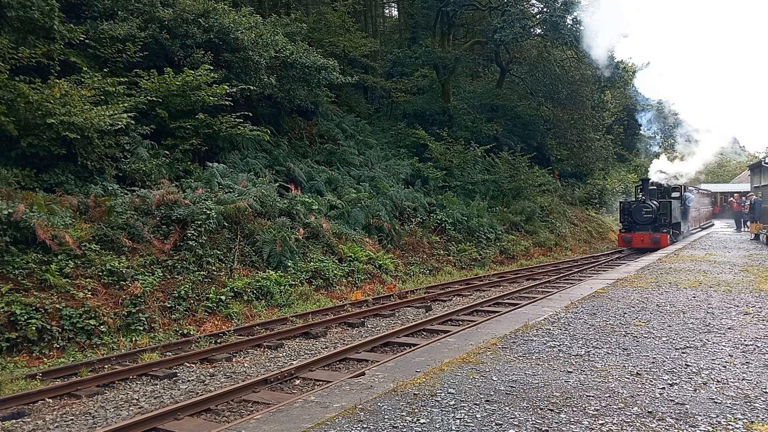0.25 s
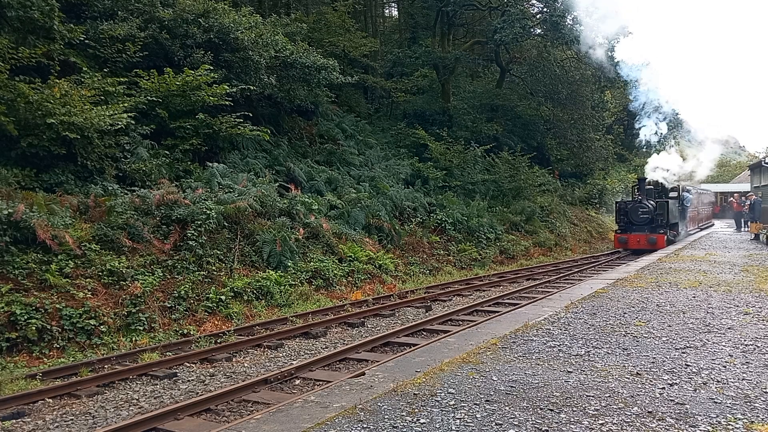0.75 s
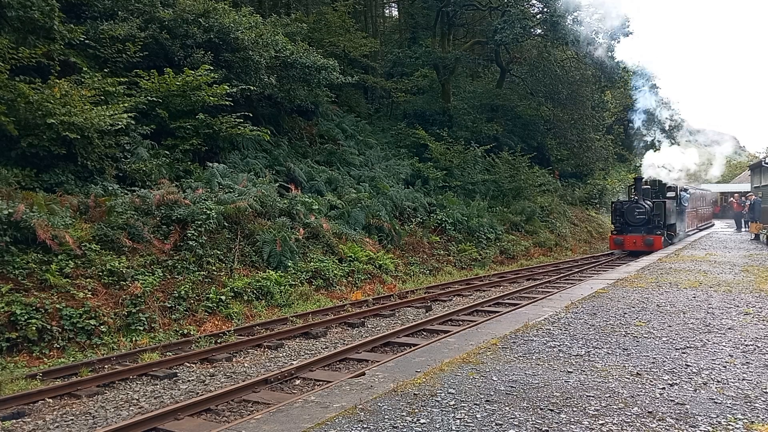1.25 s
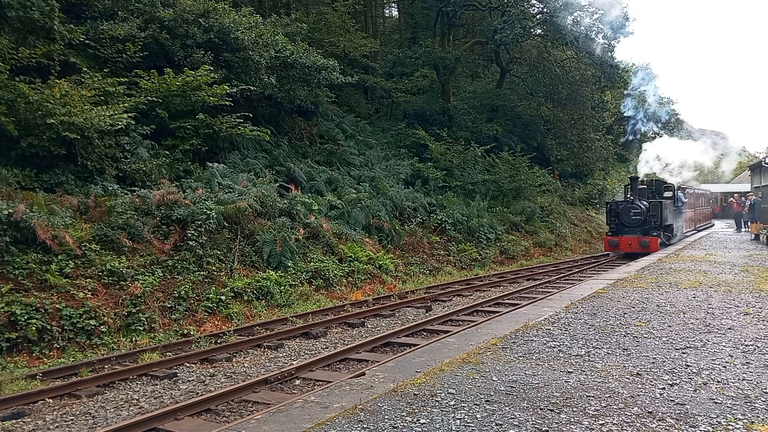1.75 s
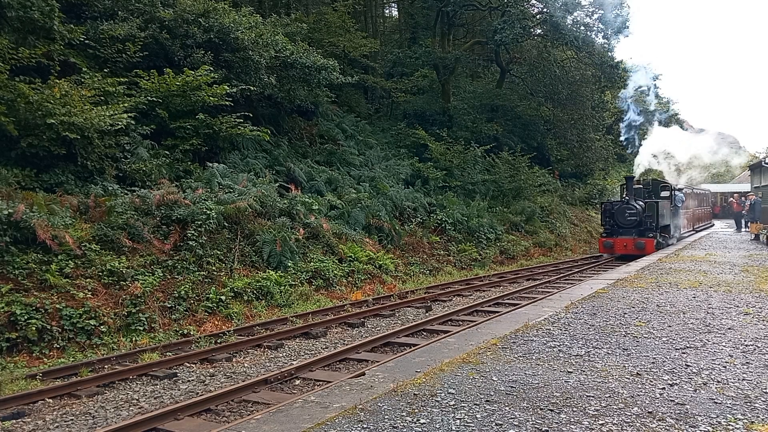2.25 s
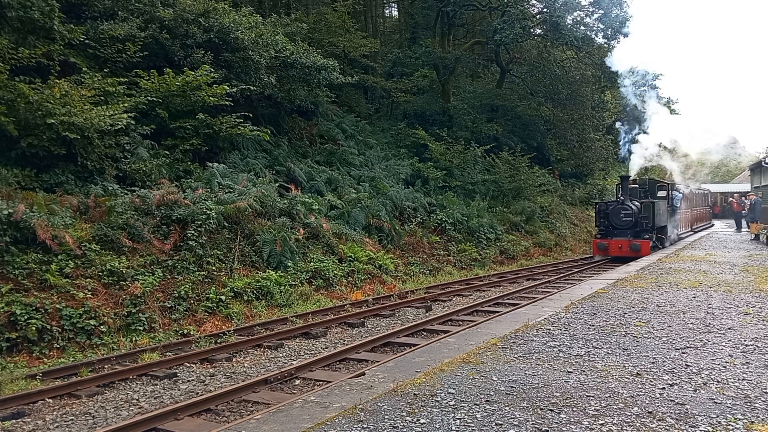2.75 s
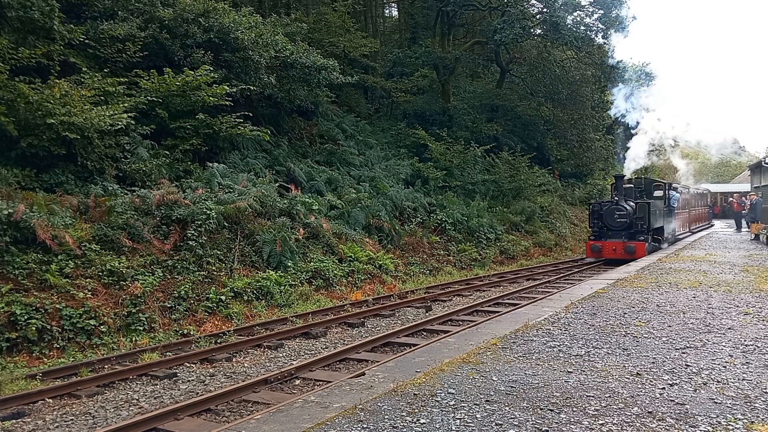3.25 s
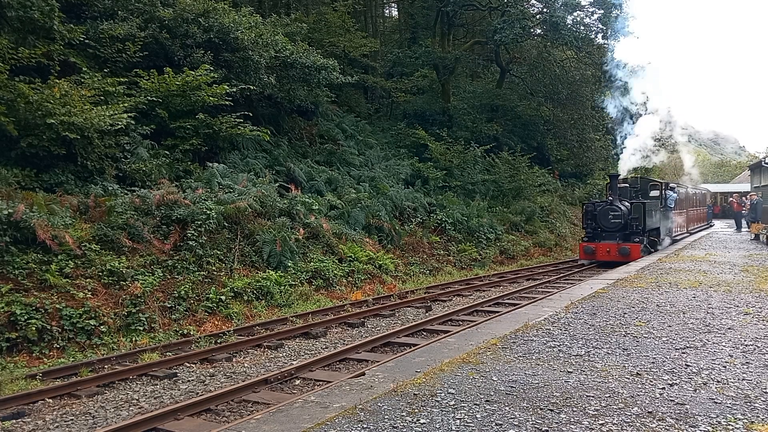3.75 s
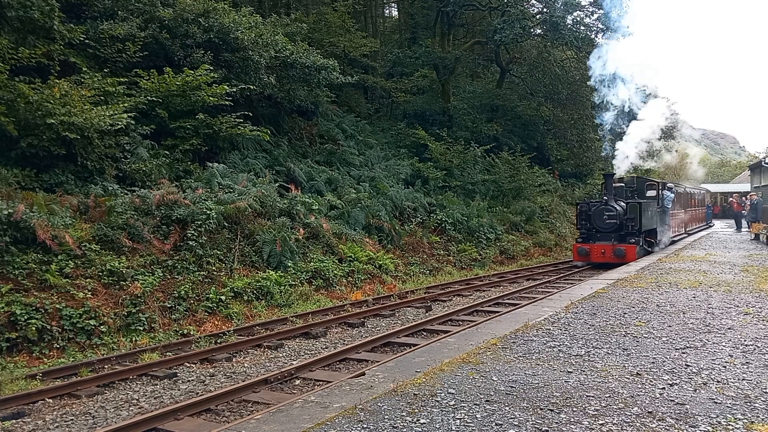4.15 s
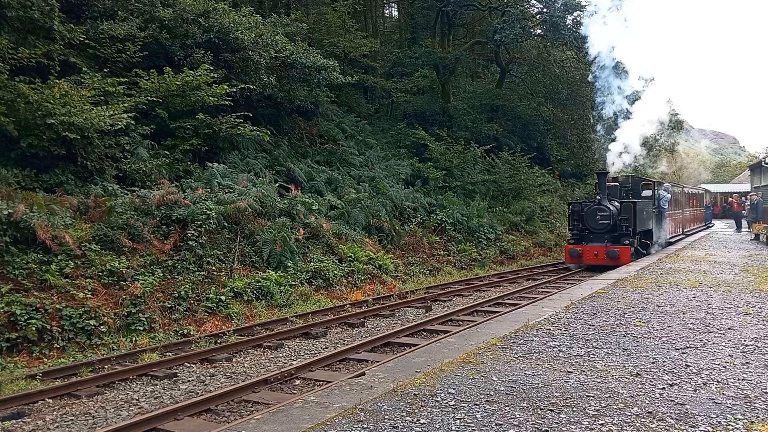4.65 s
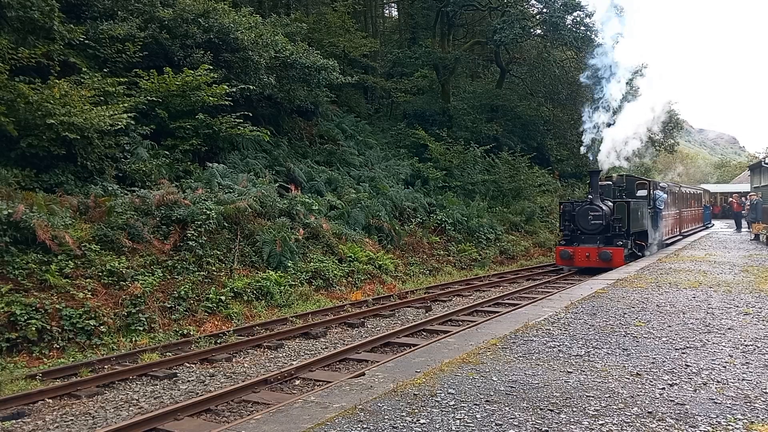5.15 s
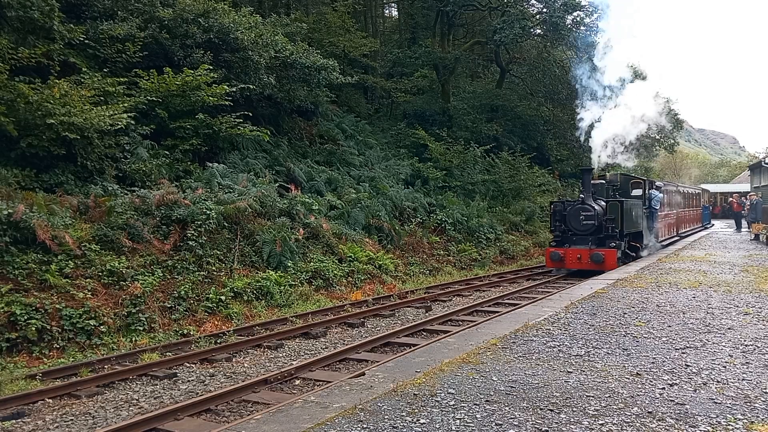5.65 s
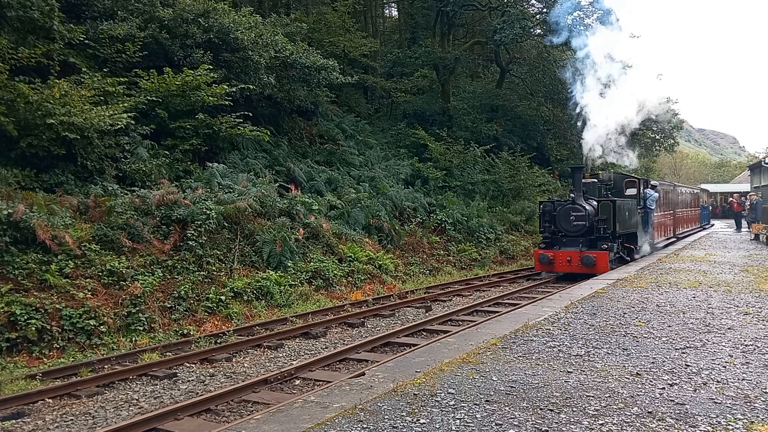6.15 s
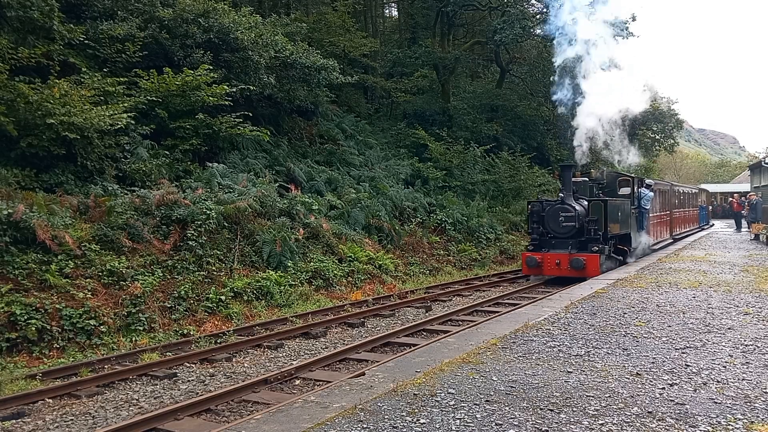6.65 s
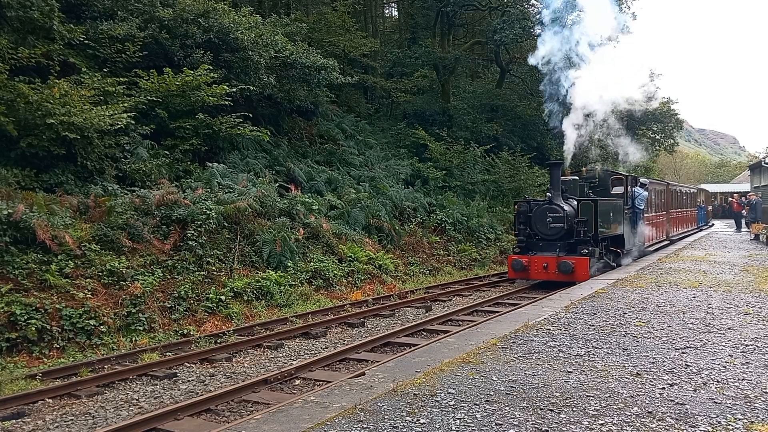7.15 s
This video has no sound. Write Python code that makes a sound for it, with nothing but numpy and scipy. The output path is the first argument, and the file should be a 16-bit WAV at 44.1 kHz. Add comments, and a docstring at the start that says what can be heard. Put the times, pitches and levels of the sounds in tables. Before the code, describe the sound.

A small steam locomotive pulls away from a station, its chuffs quickening and growing louder as it nears, with steam hiss and wheel rumble.

```python
"""At a small railway station a steam locomotive pulls away towards two microphones, keeping to their right.
Exhaust beats, four a wheel turn, bark up the chimney, faster and louder: bursts of noise and ringing tones.
Hissing steam leaks, fire draught and wheel rumble are shaped noise; rail joints thud as sagging, dying sines.
A wooded bank answers the beats with noisy echo tails, and a faint horn-like tone of sines sounds far off."""
import sys
import numpy as np
from scipy import signal
from scipy.fft import rfft, irfft, next_fast_len
from scipy.io import wavfile
from scipy.ndimage import uniform_filter1d, map_coordinates

SR = 44100
rng = np.random.default_rng(int(sys.argv[2]) if len(sys.argv) > 2 else 0)


def store_wav(level_fs):
    """Save 16-bit WAV to argv[1]."""
    pcm = np.round(np.clip(np.atleast_2d(level_fs), -1, 1) * 32767)
    wavfile.write(sys.argv[1], SR, pcm.T.astype(np.int16))


N = 325899


def amp(db):
    """Turn decibels into a plain gain."""
    return 10 ** (np.asarray(db) / 20)


def unit(x):
    """Scale to an rms of 1."""
    return x / np.sqrt(np.mean(x ** 2) + 1e-20)


def along(points, hz):
    """Read (Hz, value) points by straight lines on a log frequency axis."""
    f, v = np.transpose(points)
    return np.interp(np.log(hz + 1), np.log(f + 1), v)


def curve(points):
    """Join (s, value) points by straight lines, one value per sample."""
    return np.interp(np.arange(N) / SR, *np.transpose(points))


def wobble(rate):
    """A smooth random curve with this many random knots a second."""
    knots = rng.standard_normal(int(N * rate / SR) + 4)
    return map_coordinates(knots, [np.arange(N) * rate / SR])


def filtered(x, response):
    """Filter x by a complex response of frequency."""
    m = next_fast_len(N + SR // 2)
    return irfft(rfft(x, m) * response(np.fft.rfftfreq(m, 1 / SR)), m)[..., :N]


def mode(hz, centre_hz, width_hz):
    """A resonance with a gain of 1 at its centre."""
    return 1j * hz * width_hz / (centre_hz ** 2 - hz ** 2 + 1j * hz * width_hz)


def rush(spectrum, patchy_db):
    """Two unrelated noises of one colour and joint rms 1, sharing patches of random gain."""
    z = signal.stft(rng.standard_normal((2, N)), nperseg=512)[2]
    patches = uniform_filter1d(rng.standard_normal(z.shape[1:]), size=5, axis=0)  # smooth over frequency
    patches = uniform_filter1d(patches, size=8, axis=1)  # and over time
    pair = signal.istft(z * amp(patchy_db * unit(patches)), nperseg=512)[1][:, :N]

    def colour(hz):
        inside = (hz > spectrum[0][0]) * (hz < spectrum[-1][0])
        return amp(along(spectrum, hz)) * inside
    return unit(filtered(pair, colour))


def steady(hz, width, evenness):
    """Two narrow noises whose swells are partly evened out, as in a pipe that holds its tone."""
    shape = lambda f: mode(f, hz, width) * mode(f, hz, 11.0 * width)
    noise = filtered(rng.standard_normal((2, N)), shape)
    narrow = signal.hilbert(noise, next_fast_len(N))[:, :N]
    return unit(narrow.real / np.abs(narrow) ** np.clip(evenness, 0, 1))


def approach_db():
    """Gain of the inverse-distance law as the engine gathers speed towards the microphones."""
    start_m, speed_m_s, pull_m_s2 = 40, 1.98, 0.081
    t = np.arange(N) / SR
    distance_m = start_m - speed_m_s * t - pull_m_s2 * t ** 2 / 2
    return 20 * np.log10(start_m / distance_m)


def exhaust():
    """The turbulent jet barks, blows the chimney like an organ pipe and fizzes on top."""
    # jet heard at a distance: f/Hz, level per Hz/dB
    jet_far = [(320, -12.5), (540, -5), (650, -18), (860, 3), (940, 4.5), (1200, -3.5), (1420, -5),
               (1620, -37), (2000, -19), (2400, -18), (3200, -85)]
    # jet heard close by: f/Hz, level per Hz/dB
    jet_near = [(320, -8), (540, -16), (657, -5.5), (728, 1), (964, -1.5), (1020, 3.5), (1170, -18),
                (1470, -21), (1590, -20), (1650, -45), (2140, -57), (3630, -120)]
    # bass shoulder of the jet: f/Hz, level per Hz/dB
    jet_low = [(40, -36), (70, -6.5), (110, -5.5), (170, -5), (300, -1.5), (390, -14), (560, -13.5),
               (700, -36)]
    # fizz on top of the jet: f/Hz, level per Hz/dB
    fizz_colour = [(1900, 2), (2300, 0.5), (3000, 1), (4200, -1.5), (6000, -5.5), (7800, -7), (8700, -17),
                   (11500, -17), (15500, -28)]
    # resonances of chimney and smokebox: f/Hz, basic width/Hz (scaled below)
    chimney = [(244, 21.3), (482, 45.4), (1790, 250)]
    jet, low, octave, bass, upper, fizz = blast()
    # the ground echo recolours the jet as the engine nears
    near = np.clip(np.arange(N) / SR / 5.55, 0, 1) ** 2.7
    eddies = amp(0.94 * wobble(90))
    bark = np.sqrt(1 - near) * rush(jet_far, patchy_db=1.0)
    bark += np.sqrt(near) * rush(jet_near, patchy_db=2.0)
    shoulder = rush(jet_low, patchy_db=-1.0)
    sound = eddies * (amp(0.5) * jet * bark + amp(5.0) * bass * shoulder)
    for flow, (hz, width) in zip((low, octave, upper), chimney):
        drive = flow * steady(hz, 1.13 * width, evenness=0.37)
        ringing = filtered(drive, lambda f: mode(f, hz, 1.91 * width))
        sound += amp(3.5) * ringing
    return sound + amp(-3.5) * fizz * eddies * rush(fizz_colour, patchy_db=3.0)


def blast():
    """Strength of six sounds in every beat: a quick swell as the valve opens, then the cylinder empties."""
    # exhaust beats, levels before the mix gains: peak t/s, jet level/dB,
    # then level over the jet/dB of the chimney fundamental and of the fizz
    beats = [(-.04, -20, 1.5, -17.5), (0.263, -26.5, -.5, -11), (0.551, -28.5, -6.5, -11.5),
             (0.884, -25.5, 1, -12.5), (1.204, -26.5, 2, -14), (1.513, -24.5, 0, -16.5),
             (1.796, -25.5, -6.5, -11), (2.110, -24.5, -4, -10.5), (2.412, -26.5, 1, -12.5),
             (2.71, -21, -7, -15), (2.978, -23, -5, -13.5), (3.28, -22, -0.5, -16), (3.562, -24, -8, -12.5),
             (3.839, -21, -8.5, -14), (4.094, -22.5, -9, -13), (4.394, -20.5, -6, -13.5),
             (4.657, -21.5, -6.5, -16), (4.909, -22, -9.5, -7.5), (5.161, -24.5, -9.5, -13.5),
             (5.45, -20, -1.5, -14), (5.715, -19, -3, -24), (5.976, -21, -8.5, -16.5),
             (6.221, -19, -9, -18.5), (6.502, -17, -13, -16.5), (6.761, -19.5, -3, -16.5),
             (7.014, -16, -8, -17), (7.254, -18.5, -9, -16.5)]
    # octave, bass, upper resonance: basic level at the start/dB, gain per dB of approach/dB
    companions = [(-26.5, -1.77), (-37, -0.06), (-43.5, 2)]
    # fall time of jet, fundamental, octave, bass, upper resonance, fizz: multiple of fall_ms
    linger = [0.88, 1.31, 1.26, 1.72, 1.22, 1.74]
    rise_ms, fall_ms = 15.65, 36.1
    scatter_db = 1.5  # random spread of the companions from beat to beat
    lead = SR // 10  # samples kept ahead of each peak
    flow = np.zeros((6, N + 2 * SR))  # with a spare second at each end
    t = np.arange(-lead, SR // 4) / SR
    span = np.where(t < 0, rise_ms, np.array(linger)[:, None] * fall_ms) / 1000
    puff = np.exp(-np.abs(t / span) ** 2.07)
    start_db, grows = np.transpose(companions)
    chances_db = scatter_db * rng.standard_normal((len(beats), len(companions)))
    near_db = approach_db()
    for (s, db, ring_db, fizz_db), chance_db in zip(beats, chances_db):
        others_db = start_db + grows * near_db[max(round(s * SR), 0)] + chance_db
        levels_db = np.r_[db, db + ring_db, others_db, db + fizz_db]
        start = SR + round(s * SR) - lead
        flow[:, start:start + len(t)] += amp(levels_db)[:, None] * puff
    return flow[:, SR:SR + N]


def steam_leaks():
    """Steam escaping from glands and cocks: a broad hiss with whistling tones, a thin whistle and a top hiss."""
    # hiss of the leaks: f/Hz, level per Hz/dB
    leak_colour = [(1290, -26), (2200, -6.5), (2700, -14), (3010, -3), (3580, -7), (4000, -3.5),
                   (4720, -7.5), (5170, -7.5), (6100, -4.5), (7540, -4), (8310, -6), (8860, -56),
                   (10200, -13), (13300, -53), (22000, -120)]
    # broad tones of the leaks: f/Hz, width of the narrower filter/Hz, basic level/dB
    nozzle = [(5400, 700, -6), (6520, 200, -11), (7460, 320, -4)]
    # highest hiss: f/Hz, level per Hz/dB
    top_colour = [(9000, -57), (10100, -28), (10700, 1), (12100, -0.5), (13700, -1.5), (14800, -7),
                  (15700, -12)]
    # flare-ups of the top hiss: t/s, rise/dB, dying time/s
    surges = [(4.6, 1, .2), (5.1, 4.5, 0.11)]
    # thin whistle of one leak: f/Hz, width of the narrower filter/Hz
    thin_tone = (5650, 36)
    # its strength: t/s, level/dB
    thin_level = [(0, -58), (.5, -63), (.9, -57), (2.1, -50.5), (4, -53), (4.7, -66), (5.1, -51),
                  (7.39, -56)]
    t, near_db = np.arange(N) / SR, approach_db()
    # start level in dB before the sputter, and growth as a multiple of the inverse-distance law
    leak_db = -46 + 1.11 * near_db
    top_db = -54.5 + 1.93 * near_db
    for s, db, dying in surges:
        top_db += db * (t > s) * np.exp(-np.abs(t - s) / dying)
    white = rng.standard_normal((2, N))
    whistle = np.zeros((2, N))
    for hz, width, db in nozzle:
        tone = unit(filtered(white, lambda f: mode(f, hz, width) * mode(f, hz, 6.8 * width)))
        whistle += amp(db + 0.77 * wobble(2.94)) * tone
    sputter_db = 0.42 * wobble(9.9)
    hiss = rush(leak_colour, patchy_db=1.96) + amp(0.5) * whistle
    leak = amp(leak_db + sputter_db) * hiss
    thin = amp(curve(thin_level)) * steady(*thin_tone, evenness=0.33)
    top = amp(top_db + sputter_db) * rush(top_colour, patchy_db=2.0)
    return leak + thin + top


def fire_draught():
    """The draught of the fire in the chimney: a wavering low roar that grows as the engine nears."""
    # roar of the draught: f/Hz, level per Hz/dB
    draught_colour = [(120, -29), (200, -3), (245, 6.5), (280, -5.5), (320, -6), (390, -7), (470, -6),
                      (600, -8.5), (1000, -11.5), (1600, -17.5), (2700, -21), (4000, -41)]
    # start level in dB before the wavering, and growth as a multiple of the inverse-distance law
    level_db = -39.5 + 0.99 * approach_db()
    return amp(level_db + 0.64 * wobble(19)) * rush(draught_colour, patchy_db=2.0)


def wheel_rumble():
    """Rolling wheels: deep noise with an unsteady level."""
    # colour of the rumble: f/Hz, level per Hz/dB
    rumble_colour = [(22, -36), (42, -33), (65, -5.5), (110, -4), (170, -6.5), (260, -31), (400, -43)]
    # rumble before the random unsteadiness: t/s, level/dB
    wheels = [(0, -46), (.8, -44.5), (1.2, -41.5), (2.8, -43), (3.2, -39), (4.8, -39), (5.14, -34),
              (5.6, -40.5), (6.2, -39), (6.6, -37.5), (7.39, -40.5)]
    return amp(curve(wheels) + 1.5 * wobble(16)) * rush(rumble_colour, patchy_db=0.5)


def joints():
    """Each wheel drop on a rail joint is a dull, quickly damped thud that sags in pitch."""
    # wheels on rail joints: start t/s, level before rise and decay/dB, pitch it sags to f/Hz
    drops = [(2.933, -27, 85), (3.218, -13, 92.4), (7.118, -21, 100), (7.132, -18, 79)]
    out, t = np.zeros(N + SR), np.arange(SR // 4) / SR
    for s, db, hz in drops:
        turns = hz * (t + 0.0081 * (1 - np.exp(-t / 0.0039)))
        rise = 1 - np.exp(-t / 0.0033)
        decay = amp(db - 60 * t / 0.1)  # 60 dB down in 0.1 s
        out[round(s * SR):][:len(t)] += decay * rise * np.sin(2 * np.pi * turns)
    return out[:N]


def bank(pair, delay):
    """The wooded bank returns each beat late and diffuse; a new tail every third of a second."""
    # dying of the echo: f/Hz, time to fall 60 dB/s
    dying = [(200, 0.5), (900, 0.32), (3000, 1), (9000, 0.37)]
    out, hop = np.zeros((2, N + 2 * SR)), SR // 3
    for start in range(0, N, hop):
        hz, t, z = signal.stft(rng.standard_normal((2, SR // 2)), SR, nperseg=256)
        decay = amp(-60 * t / along(dying, hz)[:, None])
        tail = signal.istft(z * decay, SR, nperseg=256)[1]
        tail = tail / np.linalg.norm(tail[0])
        wet = signal.fftconvolve(pair[:, start:start + hop], tail, axes=1)
        out[:, start + round(delay * SR):][:, :wet.shape[1]] += wet
    return out[:, :N]


def horn():
    """A far, wavering harmonic tone; its third partial carries best, the higher ones come later and flicker."""
    # partials: multiple of the base pitch, from t/s, loudest t/s, to t/s
    partials = [(3, .35, 1.2, 1.8), (4, .9, 1.25, 1.8), (5, .75, 1.3, 1.85)]
    # rms of each partial at its loudest, before flicker: level/dB
    partial_db = [-52.5, -57, -55.5]
    base_hz = 451
    t = np.arange(N) / SR
    turns = np.cumsum(base_hz * (1 + 0.0017 * wobble(11))) / SR
    sound = np.zeros(N)
    for (k, *span), db in zip(partials, partial_db):
        swell = np.interp(t, span, [0, 1, 0]) ** 0.47
        flicker = amp(db + 2.2 * wobble(12))
        sound += swell * flicker * np.sqrt(2) * np.sin(2 * np.pi * k * turns)
    return sound


def ports(pair):
    """Mix shared and differing parts for two ports; the left lags less as the engine comes round to the front."""
    # how alike the two ports sound: f/Hz, likeness (1 = the same)
    alike = [(30, .91), (100, .99), (300, .98), (700, .89), (1400, .76), (3000, .52), (6000, .56),
             (9500, .52), (13000, .36)]
    # left minus right: f/Hz, level/dB
    tilt = [(60, -.9), (300, -1), (600, -.4), (1400, .5), (2800, .9), (5600, -.4), (8000, .4),
            (12000, -1.8)]
    # lag of the left port well above the bass: t/s, lag/microseconds
    left_lag = [(0, 190), (4.5, 175), (6, 155), (7.4, 140)]
    hz, t, z = signal.stft(pair, SR, nperseg=1024)
    turn = np.arccos(np.clip(along(alike, hz), -1, 1))[:, None] / 2
    same, other = np.cos(turn) * z[0], np.sin(turn) * z[1]
    lag = np.interp(t, *np.transpose(left_lag)) / 10 ** 6
    # the bass flows round the body that holds the ports and arrives almost together
    lag = lag / (1 + (580 / (hz[:, None] + 1)) ** 3)
    # each port takes half of the level difference and half of the lag
    half = amp(along(tilt, hz)[:, None] / 2) * np.exp(-1j * np.pi * lag * hz[:, None])
    left, right = (same + other) * half, (same - other) / half
    return signal.istft(np.array([left, right]), SR, nperseg=1024)[1][:, :N]


def scene():
    """Add the engine, its echo and the far tone, then place them between the two ports."""
    beats = exhaust()
    # the direct sound gains on the echo as the engine nears
    wet_db = np.interp(np.arange(N) / SR, [0, 7.4], [-10, -13])
    echo = bank(amp(wet_db) * beats, delay=.03)
    engine = beats + steam_leaks() + fire_draught() + wheel_rumble() + joints()
    return ports(engine + echo + horn())


def record(dry):
    """Keep nothing above the band limit of 15520 Hz."""
    return filtered(dry, lambda hz: hz < 15520)


dry = scene()
out = record(dry)
store_wav(out)
```